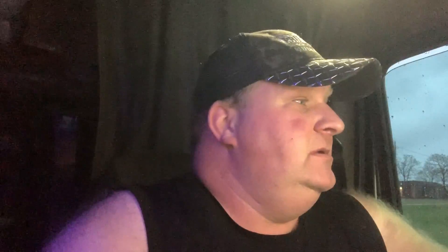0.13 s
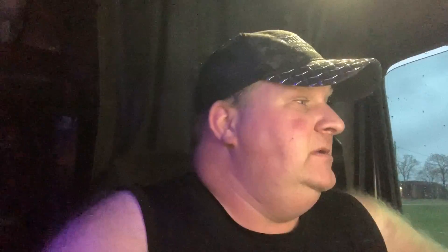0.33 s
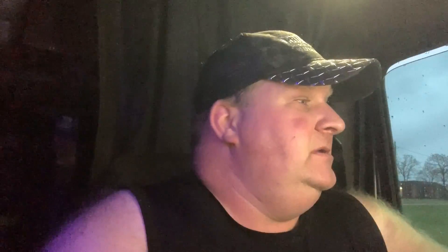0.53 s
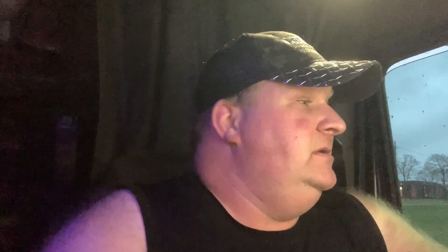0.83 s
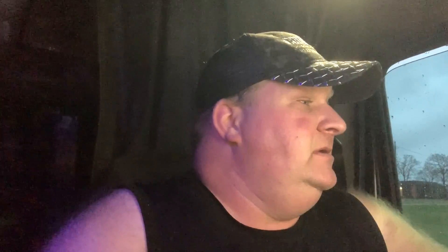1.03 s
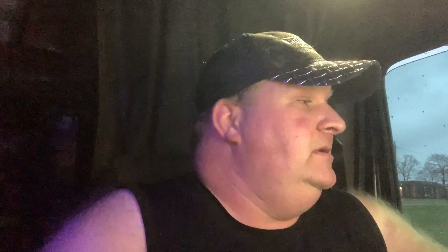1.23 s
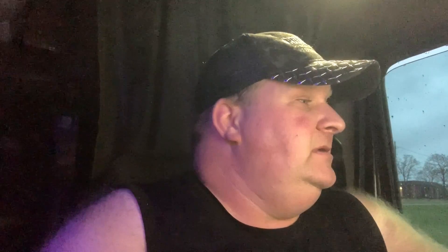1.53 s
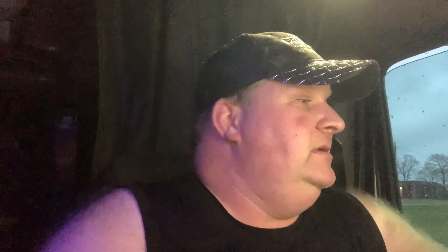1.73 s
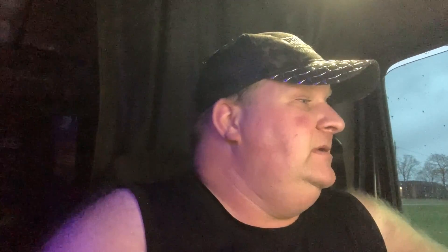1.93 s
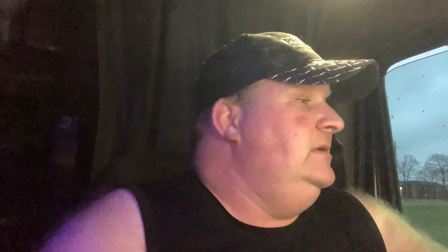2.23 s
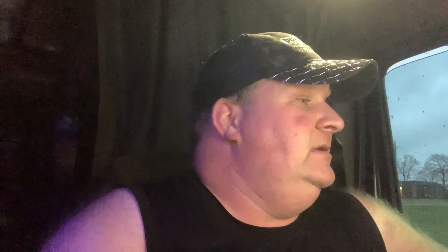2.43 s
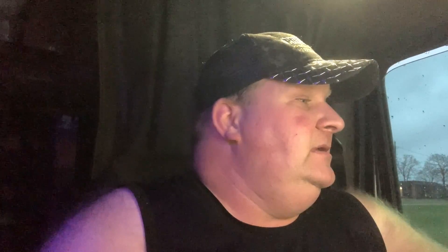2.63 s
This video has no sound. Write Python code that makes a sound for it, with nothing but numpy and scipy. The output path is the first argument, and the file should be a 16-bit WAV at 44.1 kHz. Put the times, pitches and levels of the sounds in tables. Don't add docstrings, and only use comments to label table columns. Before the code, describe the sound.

Steady diesel idle from inside a truck cab, deep booming rumble with one faint low knock.

```python
import sys
import numpy as np
from scipy import signal
from scipy.fft import rfft, irfft
from scipy.io import wavfile

SR = 44100
rng = np.random.default_rng(int(sys.argv[2]) if len(sys.argv) > 2 else 0)


def attenuation_scalar(level_db):
    decades = np.asarray(level_db, float) / 20
    return 10 ** decades


def to_wav(sig):
    pcm = np.clip(np.atleast_2d(sig), -1, 1) * 32767
    pcm = np.round(pcm).astype(np.int16)
    wavfile.write(sys.argv[1], SR, pcm.T)


N = 123479

# t/s, rate/firings per s
FIRING_RATE = [(0, 25.26), (.3, 25.3), (.6, 25.24), (1.3, 25.23), (1.9, 25.27), (2.4, 25.25), (2.8, 25.2)]
# t/s, f/Hz, level/dB
BOOM_LOAD = [(0, 75.8, -30), (.25, 75.8, -31.4), (.65, 75.8, -29.7), (1.2, 75.8, -31.3), (1.7, 75.8, -30),
             (2.15, 75.8, -31.4), (2.5, 75.8, -30.1), (2.8, 75.8, -29.3)]
# multiple, level/dB
CAB_HARMONICS = [(1, -19), (2, -10.5), (3, 0), (4, -3.7), (5, -13.5), (6, -19), (7, -22.5), (8, -15),
                 (9, -21.5), (10, -23), (11, -27), (12, -20), (13, -23), (14, -35), (15, -20), (16, -29),
                 (17, -33), (18, -32), (19, -32), (20, -28), (21, -27.5), (22, -29), (23, -36), (24, -31.5),
                 (25, -33), (26, -34), (27, -38), (28, -39), (30, -37)]
# f/Hz, level/dB per Hz
ROAR_SPECTRUM = [(8, -18), (60, 8), (150, 5.5), (250, 8), (340, 12), (450, 7), (700, -4), (1100, -33.5),
                 (1600, -93.5)]
ROAR_EDGES = [30, 220, 290, 370, 480, 2000]
# f/Hz, level/dB per Hz
CLATTER_SPECTRUM = [(470, -17.5), (800, 0), (1850, -4.5), (2100, -10), (3500, -14), (4600, -21),
                    (6350, -21), (9000, -42), (12000, -67)]
# f/Hz, width/Hz, level/dB
PANEL_MODES = [(1368, 47, 2), (1518, 68, -8.5), (1618, 12, 10), (1695, 19, -3), (1853, 140, 3),
               (1976, 53, -5), (2126, 50, -4), (2237, 50, 7.5), (2463, 51, 7), (2890, 27, 4),
               (2985, 210, -5.5), (3260, 160, 3), (4320, 130, -5), (5250, 43, 5.5), (5520, 45, 5.5)]
# offset/beat rates, level/dB
WHINE_SIDEBANDS = [(-5, -103), (-4, -82), (-3, -74.3), (-2, -68.5), (-1, -65.7), (0, -59.6), (1, -70)]
# t/s, level/dB, f/Hz, t60/s
TRIM_TICKS = [
    (1.403, -69, 8000, .012),
    (1.589, -45, 650, .015),
    (2.263, -46, 700, .015),
    (2.303, -46, 750, .015),
    (2.407, -34, 320, .06),
    (2.465, -51, 1850, .025),
]


def rms_one(x):
    return x / np.sqrt(np.mean(x ** 2) + 1e-20)


def in_time(rows, axis=1):
    rows = np.array(rows)
    return np.interp(np.arange(N) / SR, rows[:, 0], rows[:, axis])


def drift(rate):
    step = 40
    pole = np.exp(-2 * step * np.pi * rate / SR)
    noise = rng.standard_normal(N // step + 2002)
    slow = signal.lfilter([1], [1, -2 * pole, pole * pole], noise)[2000:]
    return np.interp(np.arange(N) / step, np.arange(len(slow)), rms_one(slow - slow.mean()))


def coloured(spectrum, peaks=()):
    hz = np.maximum(np.arange(N // 2 + 1) * SR / N, 1)
    at, level = np.transpose(spectrum)
    db = np.interp(np.log(hz), np.log(at), level)
    for f, width, gain in peaks:
        db = db + gain / (1 + (2 * (hz - f) / width) ** 2)
    return rms_one(irfft(rfft(rng.standard_normal(N)) * attenuation_scalar(db), N))


def crank_cycles():
    first_firing_s = .0225
    return np.cumsum(in_time(FIRING_RATE)) / SR - first_firing_s * FIRING_RATE[0][1]


def microphone_hiss():
    top_hz = 13080
    return attenuation_scalar(-75) * coloured([(3000, 0), (top_hz, -4), (top_hz + 20, -60)])


def inverter_whine():
    carrier_hz, beat_hz, crest_s = 15624.15, 119.25, .00537
    outer_lag_rad, fuzz_db = 2.0, -78
    t = np.arange(N) / SR - crest_s
    envelope = 0
    for k, db in WHINE_SIDEBANDS:
        lag = outer_lag_rad * (abs(k + 1) > 1)
        envelope = envelope + attenuation_scalar(db) * np.exp(2j * np.pi * k * beat_hz * t - 1j * lag)
    tone = np.real(envelope * np.exp(2j * np.pi * carrier_hz * t))
    band = signal.butter(6, [15230, 15700], "band", fs=SR, output="sos")
    fuzz = signal.sosfilt(band, rng.standard_normal(N))
    return np.sqrt(2) * tone + attenuation_scalar(fuzz_db) * rms_one(fuzz)


def trim_ticks():
    attack_s = 0.00092
    out = 0
    for s, db, hz, t60 in TRIM_TICKS:
        t = np.maximum(np.arange(N) / SR - s, 0)
        ring = attenuation_scalar(db - 60 * t / t60) * np.sin(2 * np.pi * hz * t)
        out = out + ring * np.minimum(t / attack_s, 1)
    return out


def valve_clatter(turn):
    level_db, pulse_db, drift_db = -53, -1.5, .15
    lag = .12
    burst = np.exp(4.0 * (np.cos(2 * np.pi * (turn - lag)) - 1))
    level = attenuation_scalar(level_db + pulse_db * burst + drift_db * drift(4.2))
    return level * coloured(CLATTER_SPECTRUM, PANEL_MODES)


def block_roar(turn):
    level_db, pulse_db, patch_db = -43, 2, 0.84
    lag = 0.49
    pulse = np.cos(2 * np.pi * (turn - lag))
    spectrum = rfft(coloured(ROAR_SPECTRUM))
    hz = np.arange(N // 2 + 1) * SR / N
    edges = [0] + list(ROAR_EDGES) + [SR]
    bands = 0
    for low, high in zip(edges, edges[1:]):
        band = irfft(spectrum * (hz >= low) * (hz < high), N)
        bands = bands + attenuation_scalar(patch_db * drift(1.63)) * band
    return attenuation_scalar(level_db + pulse_db * pulse) * bands


def engine_firing(turn):
    level_db, wobble_db, wobble_per_multiple_db = -30.5, -0.13, 0.0682
    thump_top, boom_multiple = 6, 3
    knock_lag, knock_spread = .534, .014
    scatter_rad = 0.062
    thump_skew_rad, knock_skew_rad = .42, .7
    load = in_time(BOOM_LOAD, axis=2)
    out = 0
    for k, db in CAB_HARMONICS:
        lag, skew = 0, thump_skew_rad
        if k > thump_top:
            scatter = scatter_rad * rng.normal() / k / (2 * np.pi)
            lag = knock_lag + (knock_spread + scatter) * (k - thump_top)
            skew = knock_skew_rad
        sway = (wobble_db + wobble_per_multiple_db * k) * drift(6)
        if k == boom_multiple:
            sway = sway + load - load.mean()
        out = out + attenuation_scalar(db + sway) * np.cos(2 * np.pi * k * (turn - lag) - skew * (-1) ** k)
    return np.sqrt(2) * attenuation_scalar(level_db) * out


def scene():
    turn = crank_cycles()
    background = microphone_hiss() + inverter_whine() + trim_ticks()
    engine = valve_clatter(turn) + block_roar(turn) + engine_firing(turn)
    return (background + engine)[None]


def top_cut(x):
    return signal.sosfilt(signal.butter(12, 15970, fs=SR, output="sos"), x)


def record(dry):
    return top_cut(dry)


dry = scene()
out = record(dry)
to_wav(out)
```